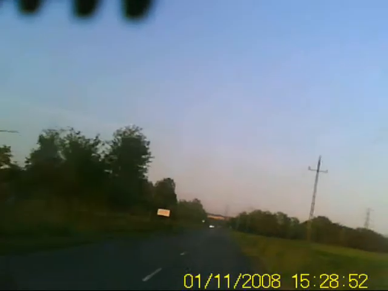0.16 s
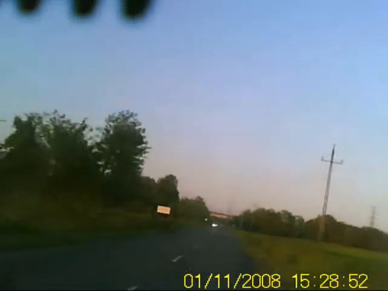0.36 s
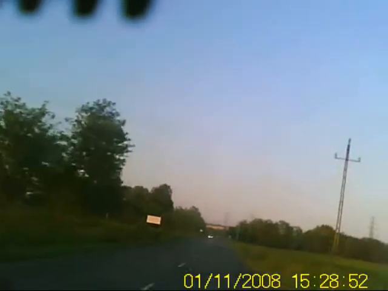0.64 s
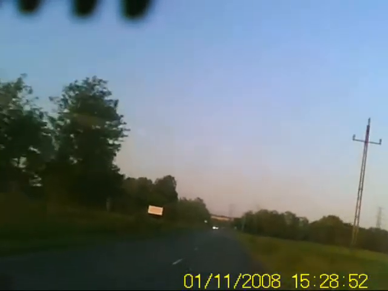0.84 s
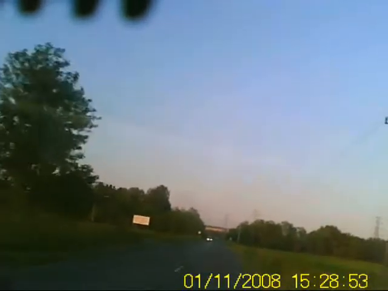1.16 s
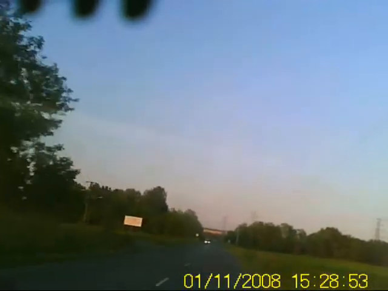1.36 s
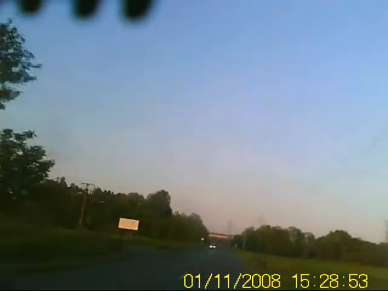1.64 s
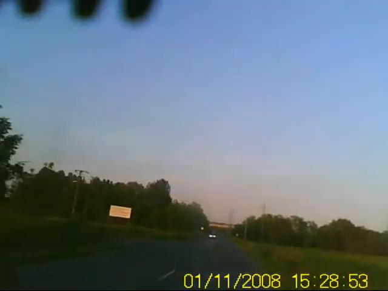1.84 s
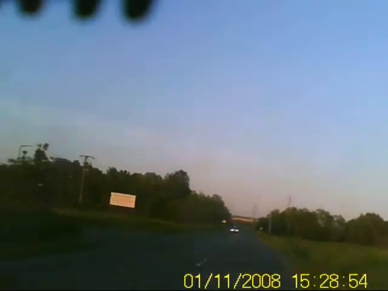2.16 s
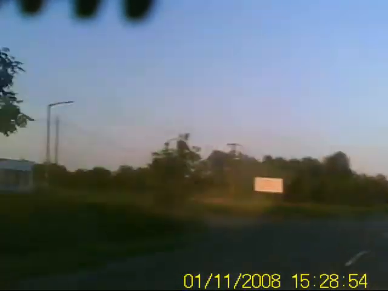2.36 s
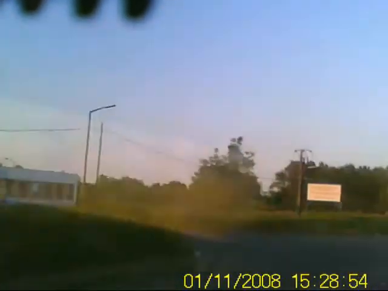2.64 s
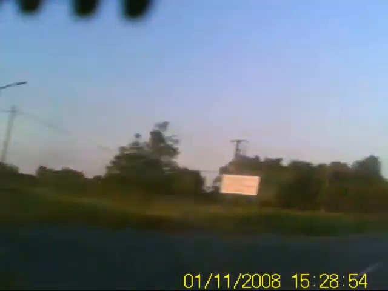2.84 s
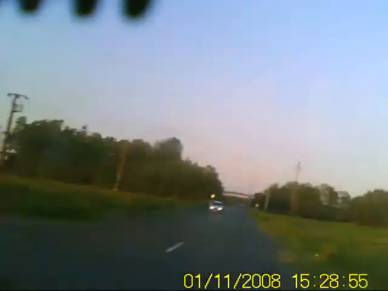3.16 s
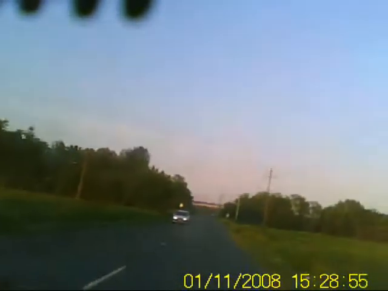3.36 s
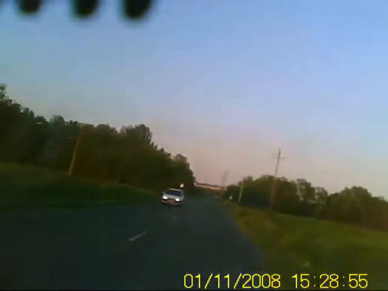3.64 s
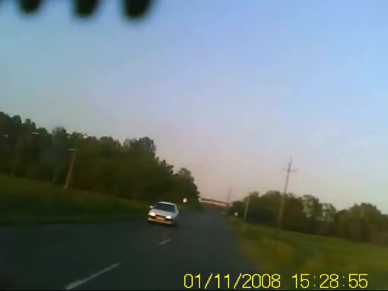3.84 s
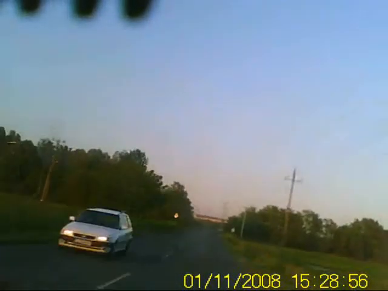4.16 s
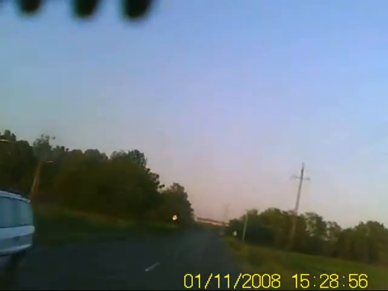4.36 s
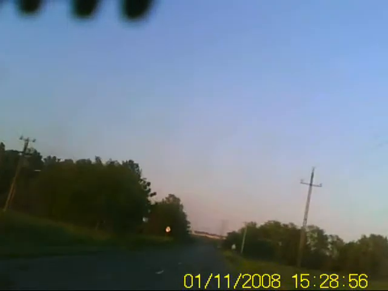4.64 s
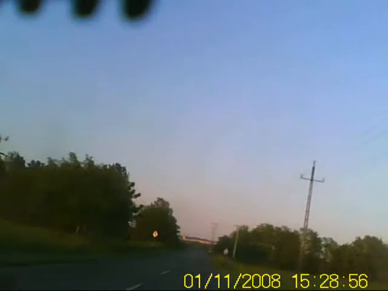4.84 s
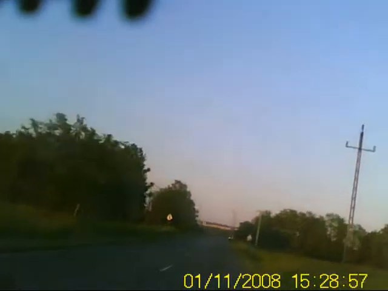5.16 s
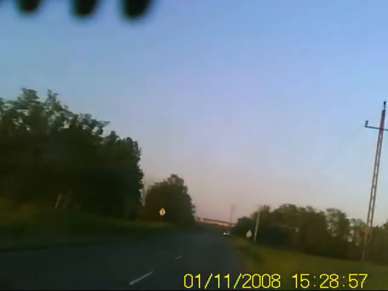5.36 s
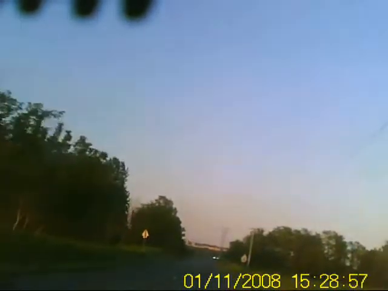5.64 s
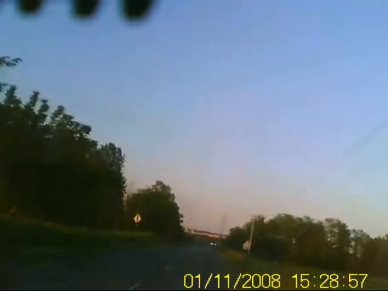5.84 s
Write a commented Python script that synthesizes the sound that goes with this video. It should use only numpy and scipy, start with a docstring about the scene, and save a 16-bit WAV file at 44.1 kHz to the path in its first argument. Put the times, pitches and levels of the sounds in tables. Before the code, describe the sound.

Heard from a rider's helmet on an open country road: continuous heavy wind rumble and roar over a steady purring motorcycle engine with faint gear whine. Irregular bursts of deep, fast buffeting thump the microphone, overloading it and chopping the other sounds. Around four seconds an oncoming car adds a faint bright tyre hiss that vanishes as it passes. The sound is coarse and low-fidelity.

```python
"""A rush of wind over a purring engine throughout: a motorcycle on an open road, heard at the helmet.
Wind is shaped noise, the engine is a set of sines, and eddies add slow pressure swings near 22 Hz.
Now and then a short puff of rougher air is heard among the swings, and the bright tyre hiss of an
oncoming car grows until it passes. The swings overload the microphone on one side, which chops the
wind, engine and gear whine. A coarse converter then adds a mirror image of the treble."""
import sys
import numpy as np
from scipy import signal
from scipy.fft import rfft, irfft, next_fast_len
from scipy.io import wavfile
from scipy.ndimage import uniform_filter1d

SR = 44100
rng = np.random.default_rng(int(sys.argv[2]) if len(sys.argv) > 2 else 0)


def to_wav(sig):
    """Store sig (one row per channel, or 1-D mono) as 16-bit WAV at the path in sys.argv[1].

    Samples outside -1..1 are clipped; the rate is SR.
    """
    pcm = np.clip(np.atleast_2d(sig), -1, 1) * 32767
    pcm = np.round(pcm).astype(np.int16)
    wavfile.write(sys.argv[1], SR, pcm.T)  # frames by channels


N = 264159

# Airflow over the helmet, which builds as a car approaches and drops in its wake:
# (time [s], strength [dB], hiss level before flutter [dB])
AIRFLOW = [(0, -1, -52.5), (.35, 0.4, -50.5), (.65, 1, -51.5), (1.0, -1, -50.5), (1.3, 0.5, -50.5),
           (1.6, 0.1, -51), (2.0, -0.5, -51), (2.5, 1.2, -50), (2.9, -1, -51), (3.4, 3, -49), (3.7, 0, -49),
           (4.08, 3, -50), (4.2, -1.1, -52.5), (4.5, -1.5, -51.5), (4.75, -0.5, -52), (5.05, 0, -50),
           (5.7, -0.2, -50.5), (6, 1, -50)]
# Tone colour of the three wind layers, relative levels: (frequency [Hz], density [dB per Hz])
RUMBLE_SPECTRUM = [(3, -23), (10, -6.5), (22, -1.5), (32, -5.5), (60, -8.5), (120, -15.5), (170, -25),
                   (300, -44)]
ROAR_SPECTRUM = [(90, -48.5), (150, 0.5), (200, -1), (300, -5.5), (450, -11.5), (700, -19), (950, -22),
                 (1500, -46)]
HISS_SPECTRUM = [(600, -29.5), (950, -5.5), (1400, -0.5), (2100, -6), (2700, -8.5), (3300, -16.5),
                 (4300, -21.5), (6500, -23.5), (8500, -23), (9800, -30.5), (10800, -33), (11100, -35)]
# Rumble and roar: base level [dB], then how many dB they gain per dB of airflow strength
RUMBLE_BASE_DB, RUMBLE_SHARE = -24.5, 0.7
ROAR_BASE_DB, ROAR_SHARE = -35.5, 1.2

# Exhaust tones, then gear and chain whine:
# (multiple of firing rate [ratio], rms level before load and waver [dB], gain per mesh load [dB per dB])
ENGINE_TONES = [(1.0, -39, 0), (2.0, -38.5, 0), (3.0, -54, .3), (3.641, -53, .5), (6.312, -60.5, .2),
                (7.285, -61, .8), (22.5, -80, 1.5)]
# How hard the engine works: (time [s], level of all engine tones [dB], gear mesh load [dB])
ENGINE_LOAD = [(0, -1.3, -3), (1.6, -1, 0), (2.75, .3, -4), (3.0, .4, 3), (3.9, .8, 3), (4.4, -1.7, .5),
               (6, -.7, 1)]
# The firing rate climbs steadily, then holds
START_HZ, GAIN_HZ_PER_S, TOP_HZ = 162.4, 1.12, 168.1
# Wobble of each tone: phase [radians per multiple] and level [dB]
BLUR_RAD, WAVER_DB = 0.07, 0.9

# Bursts of buffeting by eddies:
# (time near first deep suction [s], swing [dB], beat rate [Hz], hold at full strength [s])
BUFFET_BURSTS = [(0.061, -15.5, 19.5, 0.0075), (0.321, -17, 24, 0.038), (0.433, -15.5, 23, 0.11),
                 (0.638, -17, 23.8, 0.097), (0.845, -12, 22.6, 0.023), (1.019, -16, 24.3, .04),
                 (1.107, -11.5, 17.2, 0.011), (1.243, -17, 14, .005), (1.351, -15, 20.8, 0.064),
                 (1.563, -12.5, 24, 0.1), (1.749, -10.5, 16.7, 0.027), (1.878, -17, 25, .005),
                 (1.932, -11, 21.8, 0.12), (2.478, -15, 28, 0.019), (2.593, -19, 30, 0.004),
                 (2.683, -15, 27, .005), (2.798, -19.5, 17.4, 0.036), (3.285, -19, 21, 0.05),
                 (3.431, -14, 37.3, 0.022), (3.568, -17, 23.4, .005), (3.981, -18, 29, 0.019),
                 (4.062, -11.5, 24.2, .035), (4.159, -12, 20.6, 0.012), (4.266, -14.5, 23, 0.089),
                 (4.836, -14, 20.6, 0.012), (4.962, -13.5, 23.5, 0.066), (5.087, -16.5, 16, 0.0034),
                 (5.259, -14, 21.7, 0.015), (5.519, -12, 20.4, 0.022), (5.736, -15.5, 19.4, 0.03),
                 (5.878, -12, 23.2, .035)]
BUFFET_RISE_S, BUFFET_FALL_S = 0.034, 0.034

# Short swells of rougher air:
# (time of peak [s], rms level at peak [dB], centre [Hz], width [octaves], length [s])
GUST_PUFFS = [(1.107, -32.5, 250, 0.35, 0.013), (2.7, -42, 550, 0.58, 0.14), (4.056, -57, 1200, 0.83, .004),
              (4.11, -56, 1200, 1.2, .007)]

# Tone colour of the car's tyre hiss, relative levels: (frequency [Hz], density [dB per Hz])
TYRE_SPECTRUM = [(2500, -21), (4500, 2), (7500, -3), (10500, -11)]
CAR_PASS_S, CAR_PASS_DB, CAR_GROW_DB_PER_S, CAR_GONE_DB_PER_S = 4.12, -68, 4.0, 150

# Tone colour of the camera's circuit hiss, relative levels: (frequency [Hz], density [dB per Hz])
CIRCUIT_SPECTRUM = [(1000, -15), (3000, -4), (8300, -2.5), (9800, -4.5), (10800, -14), (11100, -15)]
# Steady whistles of the camera electronics: (frequency [Hz], rms level before the converter [dB])
CIRCUIT_WHINE = [(3894, -82), (5600, -81.5), (7400, -82), (9600, -87.5), (10638, -94)]
EDGE_HZ = 15690  # top of the recorded band


def amp(db):
    """Turns decibels into a gain."""
    return 10 ** (np.asarray(db) / 20)


def evened(x):
    """Scales a signal to an rms of 1."""
    return x / np.sqrt(np.mean(x ** 2) + 1e-20)


def curve(rows, column):
    """Joins one column of a time table with straight lines, giving a value for every sample."""
    times = [row[0] for row in rows]
    values = [row[column] for row in rows]
    return np.interp(np.arange(N) / SR, times, values)


def drift(rate_hz):
    """Makes a random wander of rms 1, mostly slower than rate_hz, drawn every 64 samples."""
    size = next_fast_len(N // 64 + 2)
    hz = np.fft.rfftfreq(size, 64 / SR)
    spectrum = rfft(rng.standard_normal(size)) * np.exp(-(hz / rate_hz) ** 2)
    slow = evened(irfft(spectrum, size))
    return np.interp(np.arange(N) / 64, np.arange(size), slow)


def coloured(points, patchy_db, size):
    """Makes noise with a given spectrum and louder and softer patches in time and frequency."""
    frames = 4 * N // size + 5
    hz = np.fft.rfftfreq(size, 1 / SR)
    real, imaginary, patches = rng.standard_normal((frames, len(hz), 3)).T
    patches = uniform_filter1d(patches, size=8, axis=0)
    patches = evened(uniform_filter1d(patches, size=8, axis=1))
    f, db = np.transpose(points)
    level_db = np.interp(np.log(hz + 1), np.log(f + 1), db, left=-120, right=-120)
    cells = (real + 1j * imaginary) * amp(level_db[:, None] + patchy_db * patches)
    noise = signal.istft(cells, nperseg=size, noverlap=3 * size // 4)[1]
    return evened(noise[:N])


def wind():
    """Airflow makes rumble, roar and hiss; small eddies make roar and hiss flutter together."""
    flutter, lumps = drift(rate_hz=18), drift(rate_hz=17.7)
    strength_db = curve(AIRFLOW, column=1)
    rumble_db = RUMBLE_BASE_DB + RUMBLE_SHARE * strength_db + 2.0 * lumps
    roar_db = ROAR_BASE_DB + ROAR_SHARE * strength_db + 0.34 * flutter
    hiss_db = curve(AIRFLOW, column=2) + 0.32 * flutter
    rumble = amp(rumble_db) * coloured(RUMBLE_SPECTRUM, patchy_db=1.05, size=8192)
    roar = amp(roar_db) * coloured(ROAR_SPECTRUM, patchy_db=1.0, size=2048)
    hiss = amp(hiss_db) * coloured(HISS_SPECTRUM, patchy_db=0.37, size=1024)
    return rumble + roar + hiss


def engine():
    """Sines follow the crank's turning; uneven firings blur each a little in phase and level."""
    firing_hz = np.minimum(START_HZ + GAIN_HZ_PER_S * np.arange(N) / SR, TOP_HZ)
    firings = np.cumsum(firing_hz) / SR
    mesh_db = curve(ENGINE_LOAD, column=2)
    tones = np.zeros(N)
    for multiple, db, share in ENGINE_TONES:
        phase = 2 * np.pi * (multiple * firings + rng.random())
        phase = phase + BLUR_RAD * multiple * drift(rate_hz=9)
        level_db = db + share * mesh_db + WAVER_DB * drift(rate_hz=5)
        tones += np.sqrt(2) * amp(level_db) * np.cos(phase)  # sqrt(2) turns rms into peak
    return amp(curve(ENGINE_LOAD, column=1)) * tones


def buffeting():
    """Eddies swing the pressure in bursts: a quick rise to the first suction, a hold, a quick fall."""
    t, pressure = np.arange(N) / SR, np.zeros(N)
    for start, db, beat_hz, hold in BUFFET_BURSTS:
        near = slice(max(round((start - 0.15) * SR), 0), round((start + 0.35) * SR))
        u = t[near] - start
        rise = np.minimum(u, 0) / BUFFET_RISE_S
        fall = np.maximum(u - hold, 0) / BUFFET_FALL_S
        swell = np.exp(-0.5 * rise ** 2 - 0.5 * fall ** 2)
        turn = 2 * np.pi * beat_hz * u - 0.28
        # The overtone makes suction short, quick to come and slower to leave;
        # the pressure in between is broad and flat
        swing = np.cos(turn) + 0.3 * np.cos(2 * turn + 0.26)
        pressure[near] -= amp(db) * swell * swing
    return pressure


def gusts():
    """Rougher air gives soft puffs of noise, each in its own band of pitch."""
    size = next_fast_len(N)
    t, hz, puffs = np.arange(N) / SR, np.fft.rfftfreq(size, 1 / SR), np.zeros(N)
    for peak, db, centre_hz, octaves, length in GUST_PUFFS:
        band = np.exp(-0.5 * (np.log2((hz + 1) / centre_hz) / octaves) ** 2)
        noise = evened(irfft(rfft(rng.standard_normal(size)) * band, size))[:N]
        swell = np.exp(-0.5 * ((t - peak) / length) ** 2)
        puffs += amp(db) * noise * swell
    return puffs


def car():
    """Tyre hiss grows as the car nears, then drops fast on passing, when the helmet shields it."""
    u = np.arange(N) / SR - CAR_PASS_S
    change_db = np.where(u < 0, CAR_GROW_DB_PER_S * u, -CAR_GONE_DB_PER_S * u)
    return amp(CAR_PASS_DB + change_db) * coloured(TYRE_SPECTRUM, patchy_db=0.0, size=1024)


def scene():
    """Adds up everything that presses on the microphone, as one channel."""
    return (wind() + engine() + buffeting() + gusts() + car())[None]


def overload(dry):
    """The off-centre preamp flattens pressure peaks and mutes what rides on them; suction passes."""
    span, bias = 0.52, 0.58
    bent = span * (np.tanh(dry / span + bias) - np.tanh(bias))
    return bent * np.cosh(bias) ** 2  # quiet sounds keep their level


def electronics():
    """The camera's own circuits add a faint hiss and steady whistles."""
    t = np.arange(N) / SR
    sound = amp(-69) * coloured(CIRCUIT_SPECTRUM, patchy_db=0.8, size=1024)
    for hz, db in CIRCUIT_WHINE:
        sound = sound + np.sqrt(2) * amp(db) * np.sin(2 * np.pi * (hz * t + rng.random()))
    return sound


def record(dry):
    """The camera overloads, loses the deepest bass, adds its noise, samples coarsely and cuts the top."""
    bent = overload(dry)
    # The coupling capacitor, a 4 Hz high-pass, lets the flat tops droop
    bent = signal.lfilter(*signal.butter(1, 4, "high", fs=SR), bent)
    bent = bent - 0.0085  # small converter offset
    bent = bent + electronics()
    # Every second sample is kept and played twice, which folds the treble about a quarter of SR
    held = np.repeat(bent[:, ::2], 2, axis=1)[:, :N]
    low_pass = signal.firwin(1023, EDGE_HZ, window=("kaiser", 9), fs=SR)
    return signal.oaconvolve(held, low_pass[None], "same")


dry = scene()
out = record(dry)
to_wav(out)
```